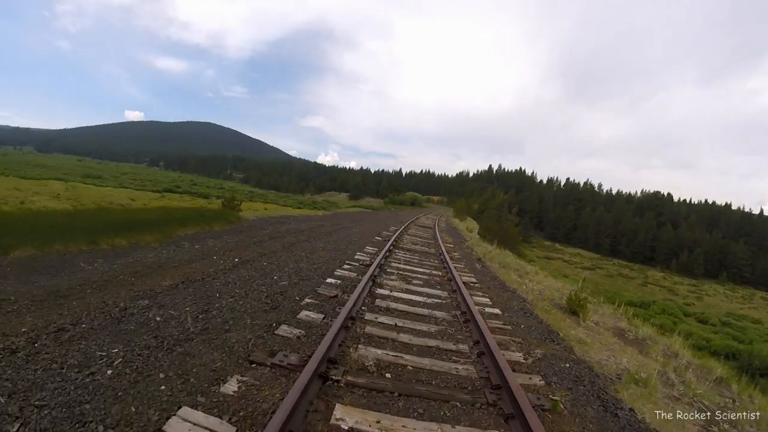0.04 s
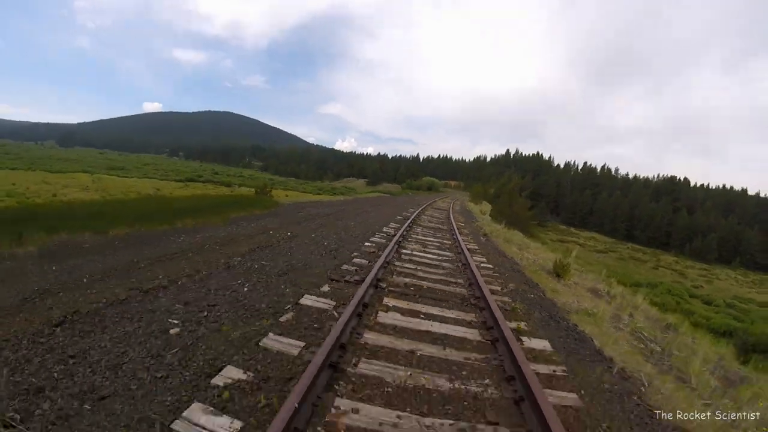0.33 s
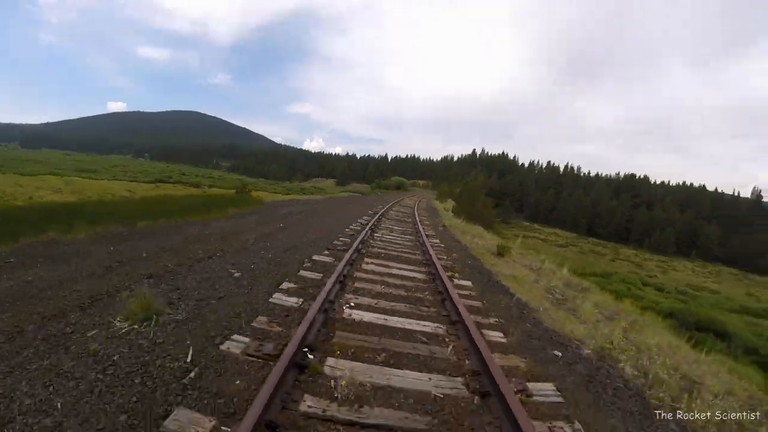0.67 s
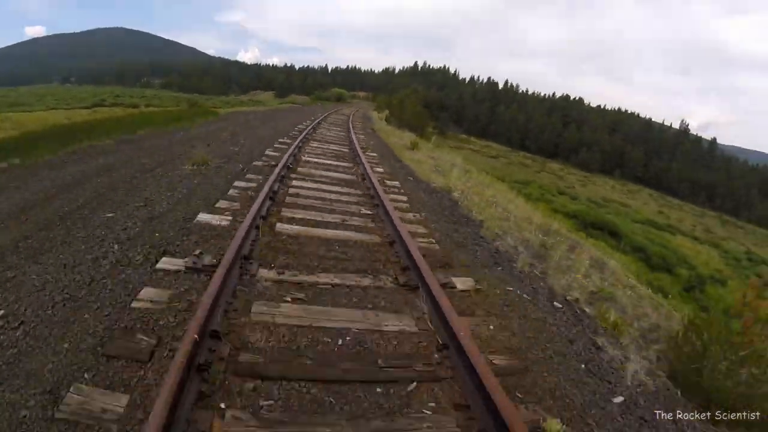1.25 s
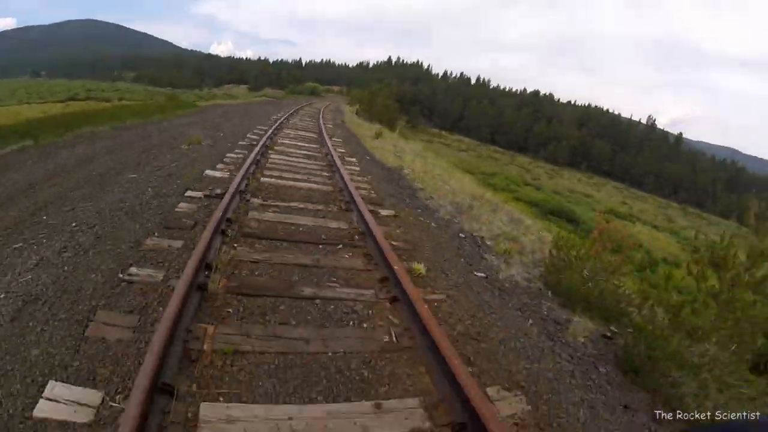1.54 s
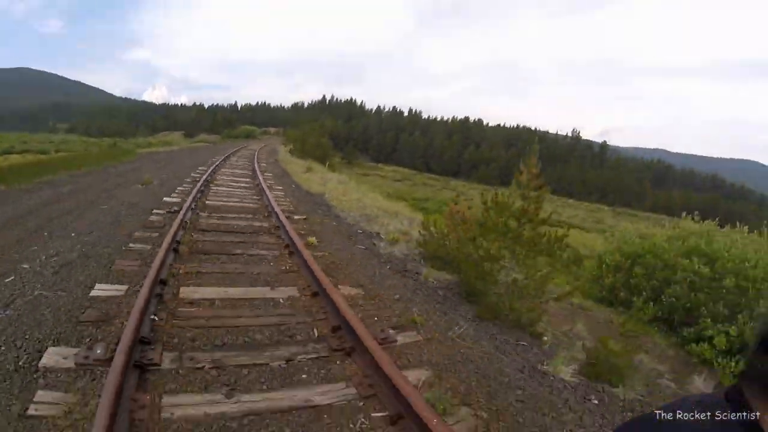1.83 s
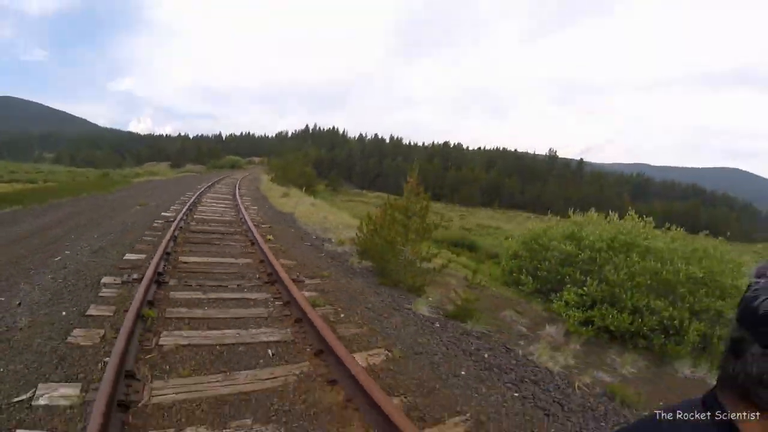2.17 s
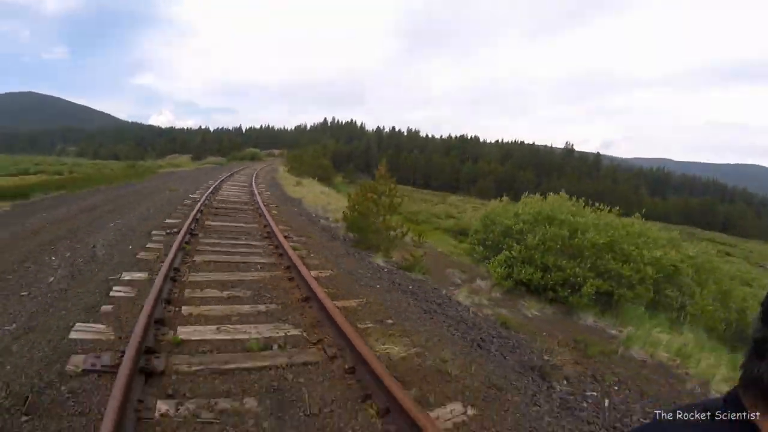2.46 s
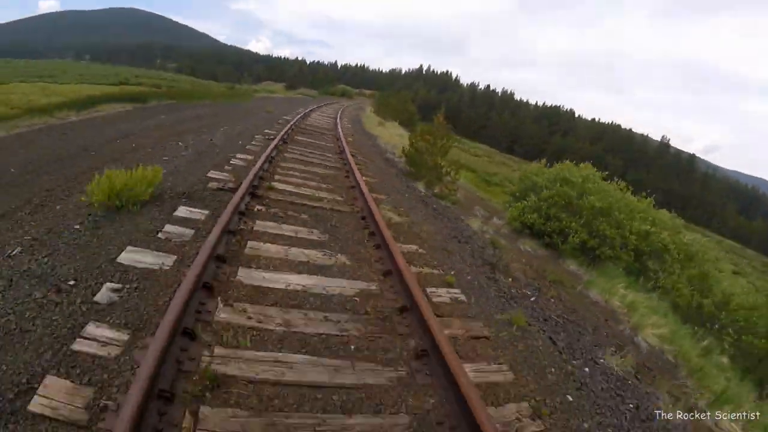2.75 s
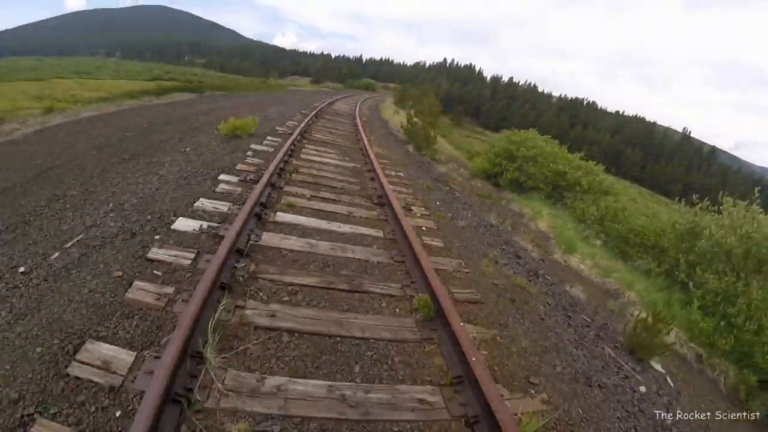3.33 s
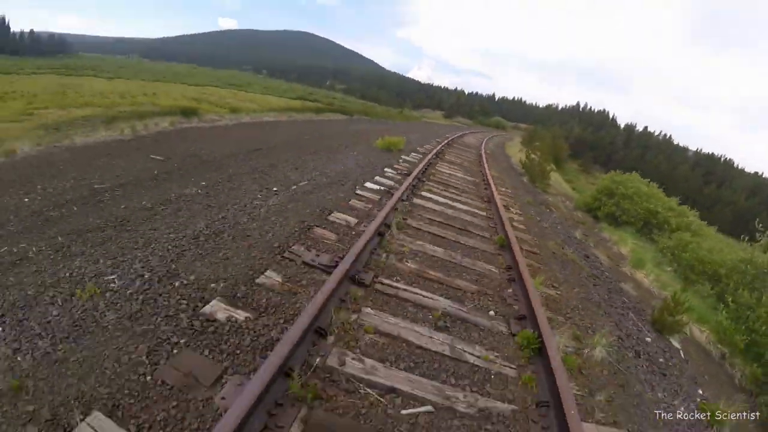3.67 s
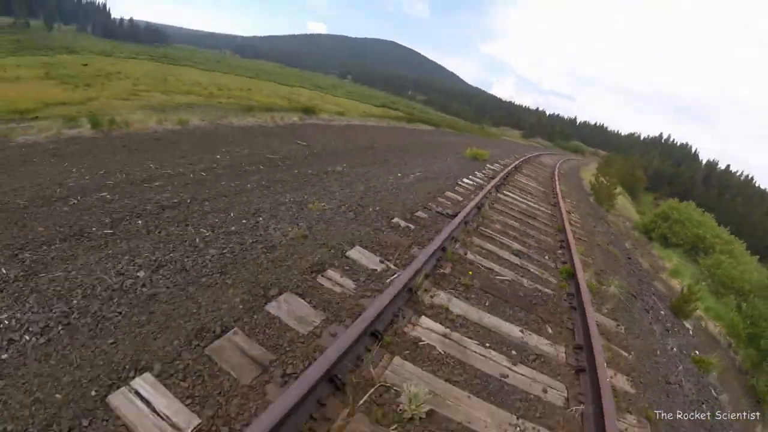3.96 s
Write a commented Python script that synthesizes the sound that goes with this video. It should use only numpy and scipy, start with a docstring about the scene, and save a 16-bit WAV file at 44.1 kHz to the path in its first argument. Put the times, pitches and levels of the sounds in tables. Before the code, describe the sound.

A small rail cart's engine drones at a steady speed with rapid ticking. Steel wheels rumble and hiss on the rails and a loose part clinks, while gusts of wind buffet the on-board microphone outdoors.

```python
"""On board a small rail cart, rolling along an old track in the open air.
Its single-cylinder four-stroke engine drones at near-steady speed: gas puffs ring the pipes, and the
valve gear knocks several times a cycle. Steel wheels rumble, hiss and scrape on rusty rails and crush
grit. The frame rings, a loose part clinks, and gusts and eddies buffet the microphone."""
import sys
import numpy as np
from scipy import signal
from scipy.fft import rfft, irfft
from scipy.io import wavfile
from scipy.ndimage import uniform_filter1d

SR = 44100
rng = np.random.default_rng(int(sys.argv[2]) if len(sys.argv) > 2 else 0)


def int16_out(signal):
    """Quantize to a 16-bit WAV file."""
    q = np.round(np.clip(np.atleast_2d(signal).T, -1, 1) * 32767)
    wavfile.write(sys.argv[1], SR, q.astype(np.int16))


N = 176400
TIME_S = np.arange(N) / SR


def undb(db):
    return 10 ** (np.asarray(db) / 20)


def unit_rms(x):
    return x / np.sqrt(np.mean(x ** 2))


def curve(rows):
    """Linear interpolation of (time [s], value) rows."""
    return np.interp(TIME_S, *np.array(rows).T)


def walk(rate_hz):
    """Random steps at rate_hz, smoothed twice; rms 1."""
    hold = int(SR / rate_hz)
    steps = np.repeat(rng.standard_normal(2000), hold)[:N]
    return unit_rms(uniform_filter1d(uniform_filter1d(steps, hold), hold))


def colour(x, points, size=8192):
    """Minimum-phase filter from (frequency [Hz], gain [dB]) rows; output rms 1."""
    hz, db = np.array(points).T
    grid_hz = np.maximum(np.arange(size // 2 + 1) * SR / size, 1)
    gain = undb(np.interp(np.log(grid_hz), np.log(hz), db))
    cepstrum = irfft(np.log(gain))
    cepstrum[1:size // 2] *= 2
    cepstrum[size // 2 + 1:] = 0
    response = irfft(np.exp(rfft(cepstrum)))
    return unit_rms(irfft(rfft(x) * rfft(response, N), N))


def noise(points):
    """Coloured noise, rms 1."""
    return colour(rng.standard_normal(N), points)


def steady(x, span_s):
    """Even out level swings slower than span_s."""
    return x / np.sqrt(uniform_filter1d(x ** 2, max(int(span_s * SR), 2)) + 1e-9)


def impulses(times_s, sizes):
    """One impulse per time; any past the end are dropped."""
    samples = np.clip((np.asarray(times_s) * SR).astype(int), 0, N)
    return np.bincount(samples, sizes, N + 1)[:N]


def cycle_times(cycles, phase):
    """Times [s] at which each engine cycle reaches the given phase."""
    return np.interp(np.arange(int(cycles[-1]) + 1) + phase, cycles, TIME_S, right=2 * TIME_S[-1])


# gas puffs (phase [cycles], pipe resonance [Hz], swell [s], level [dB])
PUFFS = [(0.401, 289.5, 0.0035, -28.5), (.68, 316, 0.0021, -30), (0.55, 599, 0.0027, -36.5),
         (.88, 618, 0.0018, -38.5), (.47, 822, 0.0024, -41.5)]
# puff strength (time [s], gain [dB])
THROTTLE = [(0, -0.5), (1.3, 3.5), (2.9, -0.5), (3.4, -3), (3.7, -1.5), (4, 1.5)]
PUFF_SCATTER_DB = 3

def exhaust_puffs(cycles):
    """Gas puffs ring the pipes every cycle."""
    age_s = TIME_S[:SR // 20]
    out = 0
    for phase, hz, swell_s, db in PUFFS:
        times_s = cycle_times(cycles, phase)
        force = undb(db + PUFF_SCATTER_DB * rng.standard_normal(len(times_s)))
        puff = age_s / swell_s * np.exp(1 - age_s / swell_s) * np.sin(2 * np.pi * hz * age_s)
        out += signal.fftconvolve(impulses(times_s, force), puff)[:N]
    return out * undb(curve(THROTTLE))


# drone harmonics (order [x cycle rate])
DRONE_ORDERS = [4, 8, 9, 10, 12, 13, 24, 36, 49, 58]
# strength per harmonic (rms level [dB])
DRONE_DB = [-35.5, -44, -39, -43, -42.5, -55, -57, -57, -68, -69]
DRONE_WAVER_DB, DRONE_FLUTTER_RAD = 1.5, 0.087

def exhaust_drone(cycles):
    """The exhaust drones on wavering harmonics of the cycle rate."""
    out = 0
    for order, db in zip(DRONE_ORDERS, DRONE_DB):
        phase_rad = 2 * np.pi * (order * cycles + rng.random()) + DRONE_FLUTTER_RAD * walk(8.8)
        out += np.sqrt(2) * undb(db + DRONE_WAVER_DB * walk(5.6)) * np.sin(phase_rad)
    return out


# valve gear and cover modes (frequency [Hz], relative level [dB], t60 [s])
VALVE_MODES = [(2515, -11, 0.062), (3150, -21, .03), (3690, -11.5, 0.055), (3900, -12, 0.048),
               (5160, -18.5, 0.026), (6380, -9, .014), (6430, -7, 0.033), (6527, -11, 0.043),
               (6600, -12, 0.015), (8000, -21, .04), (8420, -21.5, 0.023), (10700, -27, 0.044)]
CONTACT_S, MODE_SCATTER_DB = 0.00018, 2.5

def valve_ring(blows):
    """Blows ring the valve cover, each favouring different modes."""
    age_s = TIME_S[:SR // 10]
    contact = 1 - np.exp(-age_s / CONTACT_S)
    rings = [undb(db - 60 * age_s / t60_s) * contact * np.sin(2 * np.pi * hz * age_s)
             for hz, db, t60_s in VALVE_MODES]
    out = 0
    for ring in rings:
        scatter = unit_rms(undb(MODE_SCATTER_DB * rng.standard_normal(N)))
        out += signal.fftconvolve(blows * scatter, ring)[:N]
    return out / np.abs(sum(rings)).max()


# valve knocks (phase [cycles], relative rattle [dB], rattle decay [s], relative ring [dB])
KNOCKS = [(.13, -5, .003, -14), (.21, -9, .002, -7), (.445, -2, .002, 5), (.48, 0, .003, -3),
          (.55, -6, .008, -20), (.645, -5.5, .006, -7), (.785, -5, .0014, -3)]
# casing rattle spectrum (frequency [Hz], gain [dB])
CASING_COLOUR = [(500, -33), (1000, -3), (1400, 5), (2200, 3.5), (3100, 7), (3800, 6.5), (4400, -3.5),
                 (5300, 1.5), (6400, 0.5), (7400, -4), (8500, -2.5), (10700, -33), (11500, -43),
                 (14000, -57)]
# clatter strength (time [s], gain [dB])
CLATTER = [(0, -2), (.45, 1.5), (.6, -2), (1.1, 1.5), (1.6, 1.5), (1.8, -2), (2.3, -2), (2.6, 0.5),
           (2.8, 0), (2.95, 0), (3.2, 2), (3.28, -3.5), (3.55, -1), (4, -3.5)]
RATTLE_DB, RING_DB = -48, -50.5
RATTLE_SCATTER_DB, RING_SCATTER_DB, KNOCK_JITTER_S = 3.5, 0.5, 0.0002

def valve_gear(cycles):
    """The same knocks each cycle, uneven in force, rattle the casing and ring the valve cover."""
    age_s = TIME_S[:SR // 10]
    rattle, taps = 0, 0
    for phase, rattle_db, decay_s, ring_db in KNOCKS:
        due_s = cycle_times(cycles, phase)
        late, force, bite = rng.standard_normal((len(due_s), 3)).T
        times_s = due_s + KNOCK_JITTER_S * late
        blows = impulses(times_s, undb(rattle_db + RATTLE_SCATTER_DB * force))
        rattle += signal.fftconvolve(blows, np.exp(-age_s / decay_s))[:N]
        taps += impulses(times_s, undb(ring_db + RING_SCATTER_DB * (force + bite) / 2))
    casing = undb(RATTLE_DB) * colour(rattle * rng.standard_normal(N), CASING_COLOUR)
    cover = undb(RING_DB) * unit_rms(valve_ring(taps))
    return (casing + cover) * undb(curve(CLATTER))


# hard tappet clicks (time [s], level [dB])
CLICKS = [(.312, -27), (.3535, -32), (.398, -36), (.522, -32), (.691, -29), (1.5727, -20.5), (1.95, -25.5),
          (2.075, -28), (2.367, -37), (2.534, -35), (2.618, -29), (2.701, -38), (2.9095, -28), (2.95, -29),
          (3.035, -38), (3.117, -31), (3.201, -32), (3.906, -24.5)]

def tappet_clicks():
    """Occasional harder tappet blows ring the valve cover."""
    times_s, db = np.array(CLICKS).T
    return valve_ring(impulses(times_s, undb(db)))


# rolling, hiss and flange spectra (frequency [Hz], gain [dB])
ROLL_COLOUR = [(25, 11), (45, 11), (90, 2.5), (130, -2.5), (200, -2), (320, -2), (430, -7.5), (650, -10.5),
               (800, -17), (1400, -19), (2200, -30.5), (5000, -74.5)]
HISS_COLOUR = [(400, -6.5), (900, 4), (1500, 1.5), (2250, -5.5), (3100, -1), (3800, -4), (4400, -3),
               (5300, -10.5), (6450, -1.5), (7400, -10), (8500, -11), (10700, -20.5), (11500, -34.5),
               (14000, -44)]
SCRAPE_COLOUR = [(300, -13), (700, -14.5), (1000, 3), (1200, -7.5), (1450, -1), (1900, -5), (2400, -12),
                 (6000, -39)]
# hiss and flange envelopes (time [s], level [dB])
HISS_LEVEL = [(0, -43), (.5, -43), (.56, -47), (.75, -45.5), (1.0, -42.5), (1.45, -41), (1.58, -39),
              (1.67, -41), (1.77, -45), (2.3, -46.5), (2.8, -45), (3.15, -42), (3.27, -46.5), (3.5, -45),
              (4, -45)]
SCRAPE_LEVEL = [(0, -44.5), (.37, -42), (.6, -46.5), (.85, -45.5), (1.15, -42), (1.3, -40.5), (1.65, -43),
                (1.82, -46), (2.55, -49), (2.8, -44.5), (3.1, -45), (3.35, -47.5), (3.7, -48),
                (3.85, -42.5), (4, -48)]
ROLL_DB, HISS_GAIN_DB = -33, 0.5

def wheels():
    """Steel wheels rumble and hiss on rust; their flanges scrape the rail in the bend."""
    rumble = undb(ROLL_DB + 1.9 * walk(9.34)) * noise(ROLL_COLOUR)
    hiss = colour(rng.standard_normal(N) * undb(0.49 * walk(400)), HISS_COLOUR)
    scrape = undb(curve(SCRAPE_LEVEL) + 0.79 * walk(40)) * noise(SCRAPE_COLOUR)
    return rumble + scrape + undb(HISS_GAIN_DB + curve(HISS_LEVEL)) * hiss


# grit showers (centre [s], length [s], level [dB])
CRUNCHES = [(1.278, 0.016, -46), (1.453, 0.022, -42), (1.541, 0.022, -39.5), (1.583, 0.016, -44),
            (1.661, 0.034, -41.5)]
# crack spectrum (frequency [Hz], gain [dB])
CRUNCH_COLOUR = [(600, -6), (1500, 0), (3700, -4), (5200, -12), (6500, -1), (8500, -11), (11000, -28),
                 (14000, -45)]
CRACKS_PER_S, CRACK_SCATTER_DB = 2500, 5

def crunches():
    """Grit bursts under the wheels in short showers of tiny cracks."""
    cracks = (rng.random(N) < CRACKS_PER_S / SR) * np.sign(rng.standard_normal(N))
    cracks *= undb(CRACK_SCATTER_DB * rng.standard_normal(N))
    load = sum(undb(db) * np.exp(-(2 * (TIME_S - centre_s) / length_s) ** 4 / 2)
               for centre_s, length_s, db in CRUNCHES)
    return load * colour(cracks, CRUNCH_COLOUR)


# frame resonances (frequency [Hz], bandwidth [Hz], rms level [dB])
FRAME_MODES = [(585, 50, -53), (650, 50, -53), (850, 50, -56), (1168, 30, -58), (1303, 14, -56),
               (1388, 22, -57), (1654, 70, -60), (2503, 25, -63), (3704, 20, -62), (3897, 60, -62),
               (6540, 120, -59)]

def frame():
    """Vibration keeps the cart's narrow resonances ringing."""
    out = 0
    for hz, width_hz, db in FRAME_MODES:
        resonator = signal.iirpeak(hz, hz / width_hz, fs=SR)
        out += undb(db) * unit_rms(signal.lfilter(*resonator, rng.standard_normal(N)))
    return out


# jolts of a loose part (time [s], peak level [dB])
CLINKS = [(.145, -39), (1.197, -45), (1.909, -40), (2.161, -37), (2.411, -37), (2.62, -39), (2.911, -43),
          (3.493, -39)]
CLINK_HZ, CLINK_T60_S = 2550, 0.071

def clinks():
    """A loose metal part is jolted and rings on one note."""
    age_s = TIME_S[:SR // 4]
    times_s, db = np.array(CLINKS).T
    ring = np.sin(2 * np.pi * CLINK_HZ * age_s) * undb(-60 * age_s / CLINK_T60_S)
    return signal.fftconvolve(impulses(times_s, undb(db)), ring)[:N]


# airflow over the microphone (time [s], level [dB])
BREEZE = [(0, -18), (.6, -21.5), (.8, -24), (.95, -25), (1.15, -21.5), (1.55, -18.5), (2.0, -25.5),
          (2.15, -24), (2.6, -24.5), (2.92, -24), (3.25, -25), (3.4, -27), (3.8, -28.5), (4, -29.5)]
# gusts (centre [s], length [s], rumble [dB], buffet [dB], flutter [dB])
GUSTS = [(0.04, 0.11, -25, -24, -31), (0.184, 0.1, -25, -25, -26.5), (0.253, 0.06, -14, -21.5, -33),
         (0.429, 0.099, -17, -20, -30), (0.58, 0.027, -21, -19, -30), (0.683, 0.096, -26, -26, -36.5),
         (1.088, 0.064, -22.5, -24, -35), (1.273, 0.055, -20, -19.5, -26.5),
         (1.374, 0.063, -23, -20, -35.5), (1.467, 0.024, -34, -32, -31), (1.632, 0.062, -16, -18, -29),
         (1.772, 0.071, -16, -18.5, -30.5), (1.87, 0.052, -18, -16, -27), (1.971, 0.048, -18, -19.5, -38.5),
         (2.09, 0.11, -37, -21, -49), (2.247, 0.028, -12, -22.5, -30), (2.29, 0.066, -13.5, -35, -30),
         (2.387, 0.11, -20, -19.5, -24), (2.517, 0.013, -10.5, -20, -50), (2.717, 0.091, -18.5, -27, -32.5),
         (2.791, 0.063, -15, -19.5, -26.5), (2.991, 0.045, -18.5, -38, -42), (3.181, 0.05, -19.5, -21, -30),
         (3.246, 0.019, -14.5, -25.5, -33), (3.284, 0.019, -19, -29, -29), (3.585, 0.016, -17, -44, -32.5),
         (3.715, 0.034, -21, -42, -35)]
# wind band spectra (frequency [Hz], gain [dB])
RUMBLE_COLOUR = [(8, -28), (18, -3), (32, -3), (60, 0.5), (95, -5), (140, -15), (300, -31), (2000, -85.5)]
BUFFET_COLOUR = [(30, -27.5), (80, -5), (120, 3.5), (175, -1.5), (250, -10.5), (400, -23), (700, -38.5),
                 (2000, -70)]
FLUTTER_COLOUR = [(60, -18.5), (200, -4.5), (300, 1), (420, -4), (600, -10), (900, -19), (1500, -28.5),
                  (4000, -61)]
BREEZE_BUFFET_DB, BREEZE_FLUTTER_DB = -5.5, -19  # re rumble
FLUTTER_ROUGH_DB, SWIRL_DB = 5, 1

def wind():
    """Airflow and gusts drive a deep rumble, a buffeting above it and a ragged flutter."""
    band_db = np.array([[0], [BREEZE_BUFFET_DB], [BREEZE_FLUTTER_DB]])
    power = undb(curve(BREEZE) + band_db) ** 2
    for centre_s, length_s, *gust_db in GUSTS:
        near = np.abs(TIME_S - centre_s) < length_s
        swell = np.exp(-np.abs(2 * (TIME_S[near] - centre_s) / length_s) ** 3)
        power[:, near] += undb(gust_db)[:, None] ** 2 * swell
    rumble = steady(noise(RUMBLE_COLOUR), span_s=0.067)
    buffet = steady(noise(BUFFET_COLOUR), span_s=0.037)
    ragged = rng.standard_normal(N) * undb(FLUTTER_ROUGH_DB * walk(150))
    flutter = steady(colour(ragged, FLUTTER_COLOUR), span_s=0.053)
    bands = np.sqrt(power) * np.array([rumble, buffet, flutter])
    return bands.sum(axis=0) * undb(SWIRL_DB * walk(60))


# eddy thumps (time [s], peak level [dB], half width [s])
EDDIES = [(.044, -8, .007), (.052, -18, .0009), (.078, -8, .006), (.15, -13, .0008), (.189, -6.5, .0012),
          (.199, -7.5, .0012), (.273, -15.5, .0007), (.432, -8, .004), (.482, -9, .0028),
          (.544, -13.5, .0007), (.584, -9, .003), (1.474, -9, .007), (1.618, -11, .003), (1.733, -7, .0028),
          (1.735, -13.5, .0007), (1.791, -9, .0022), (1.863, -7, .003), (2.244, -14, .0009),
          (2.254, -13, .0012), (2.277, -10, .005), (2.33, -9, .005), (2.361, -12, .0012), (2.381, -9, .007),
          (2.418, -9, .0025), (2.734, -14.5, .0008), (2.768, -10, .0018), (2.783, -11, .0013),
          (2.804, -7, .002), (3.06, -21, .0005), (3.128, -9, .007), (3.286, -7, .008), (3.292, -20, .0007),
          (3.749, -14, .0009), (3.78, -14, .0005), (3.794, -12, .0006)]

def eddies():
    """Each eddy swings the pressure at the microphone one way and back."""
    out = 0
    for time_s, db, half_width_s in EDDIES:
        offset = (TIME_S - time_s) / half_width_s
        swing = offset / (1 + offset ** 2) ** 2
        out += undb(db) * swing / swing.max()
    return out


# engine speed (time [s], four-stroke cycle rate [Hz])
CYCLE_RATE = [(0, 24.006), (.4, 23.624), (.8, 23.775), (1.3, 23.874), (1.8, 23.885), (2.3, 23.932),
              (2.8, 24.014), (3.3, 24.106), (4, 24.094)]

def scene():
    """Engine, cart and wind at one on-board microphone."""
    cycles = np.cumsum(curve(CYCLE_RATE)) / SR
    engine = exhaust_puffs(cycles) + exhaust_drone(cycles) + valve_gear(cycles) + tappet_clicks()
    cart = frame() + clinks() + wheels() + crunches()
    return (engine + cart + wind() + eddies())[None]


LOW_CUT_HZ, ROLLOFF_HZ, TOP_HZ = 16, 12500, 13800

def record(dry):
    """Drop the deepest bass, dull the highest treble, cut the top."""
    x = signal.sosfilt(signal.butter(2, LOW_CUT_HZ, "high", fs=SR, output="sos"), dry)
    x = signal.sosfilt(signal.butter(4, ROLLOFF_HZ, fs=SR, output="sos"), x)
    return signal.sosfilt(signal.ellip(8, .2, 70, TOP_HZ, fs=SR, output="sos"), x)


dry = scene()
out = record(dry)
int16_out(out)
```